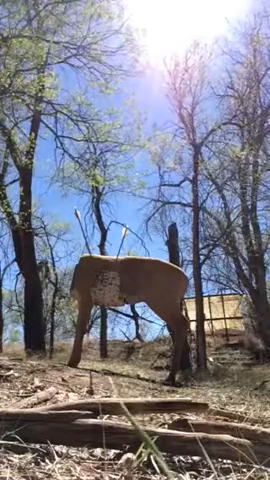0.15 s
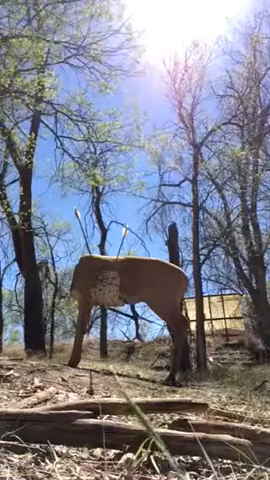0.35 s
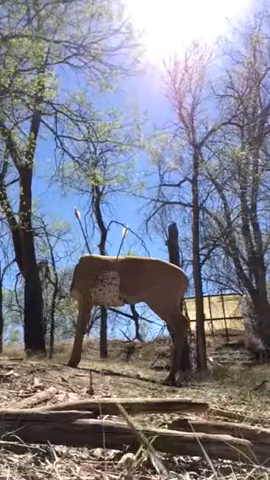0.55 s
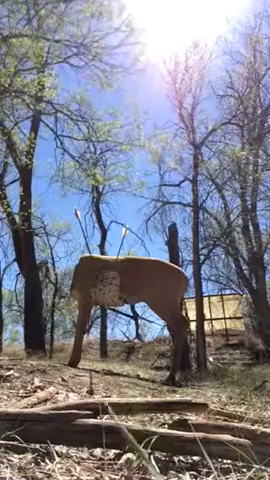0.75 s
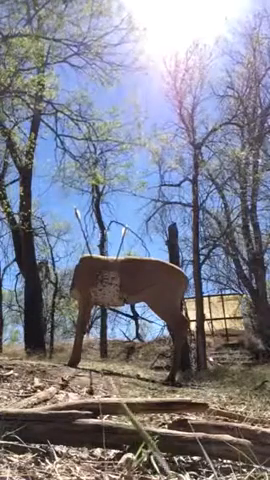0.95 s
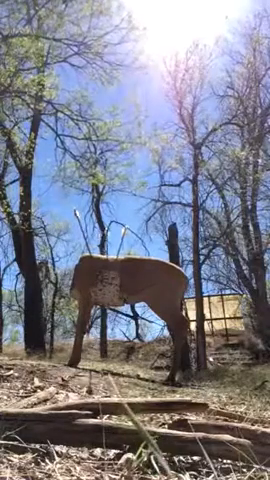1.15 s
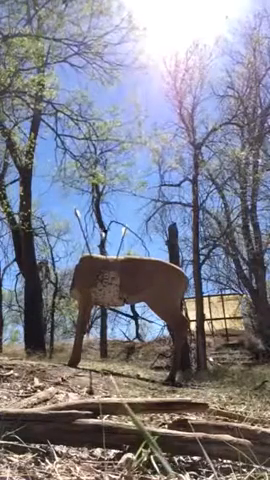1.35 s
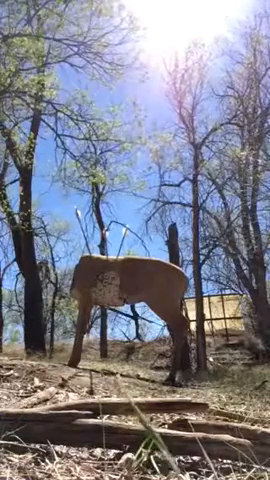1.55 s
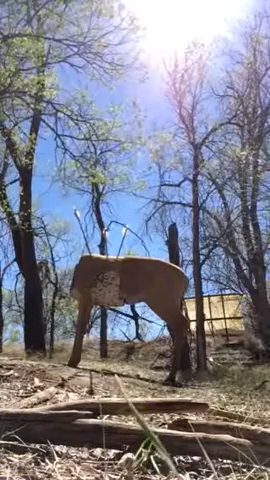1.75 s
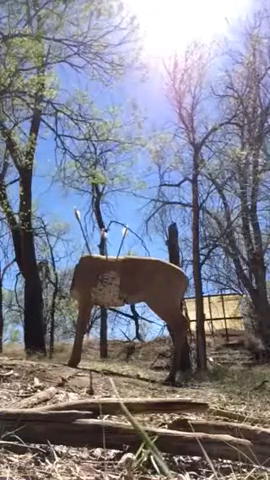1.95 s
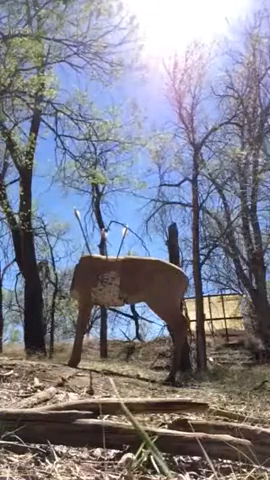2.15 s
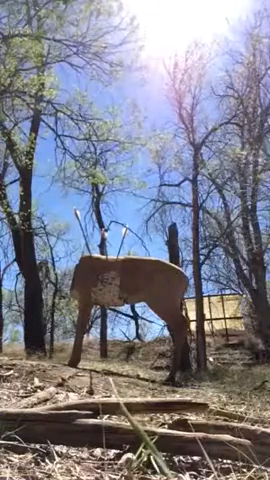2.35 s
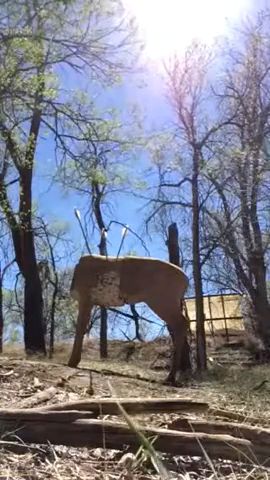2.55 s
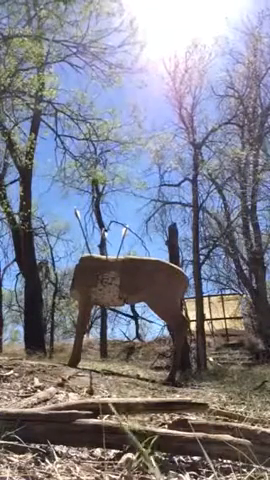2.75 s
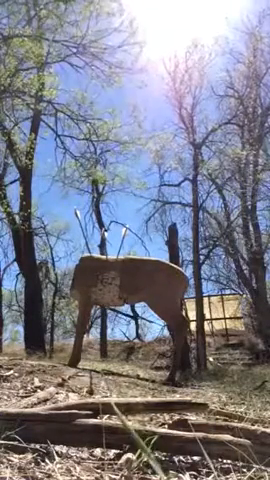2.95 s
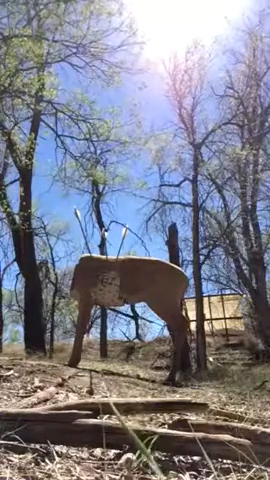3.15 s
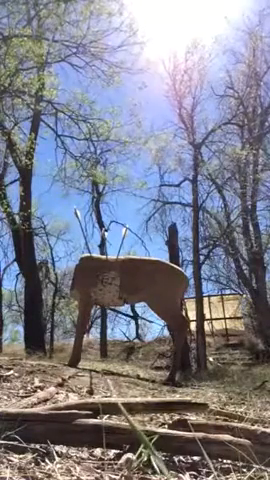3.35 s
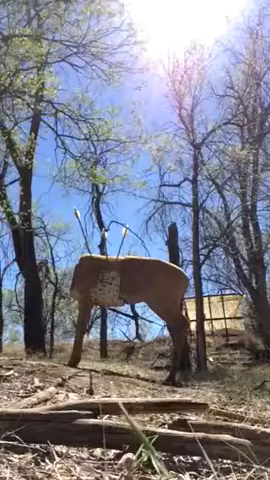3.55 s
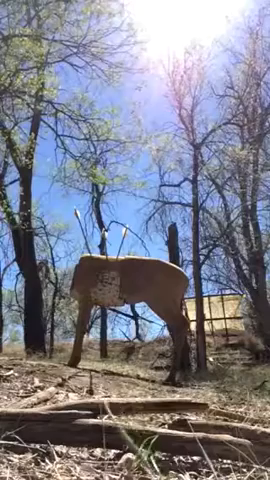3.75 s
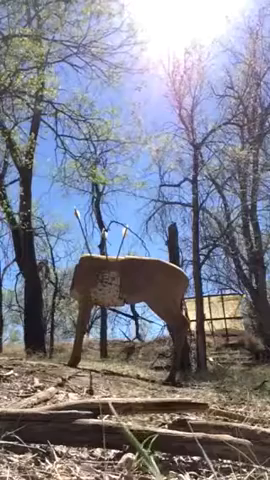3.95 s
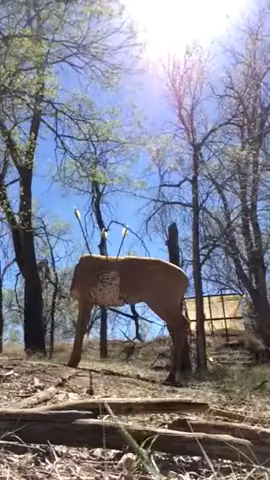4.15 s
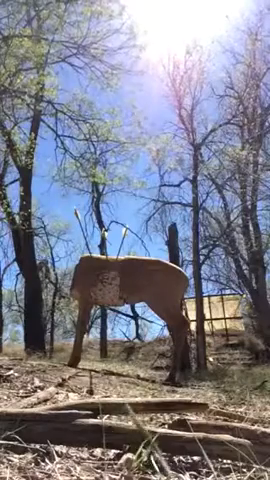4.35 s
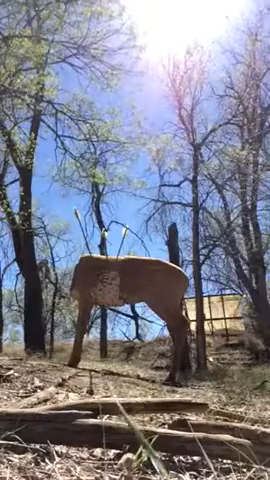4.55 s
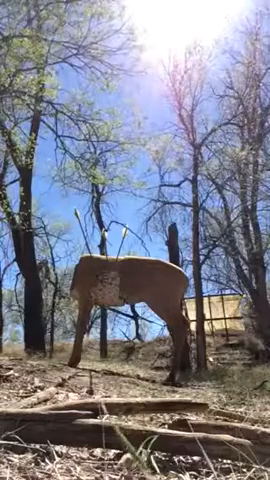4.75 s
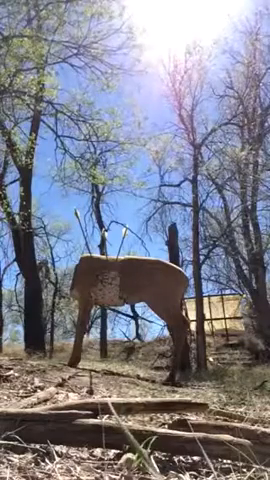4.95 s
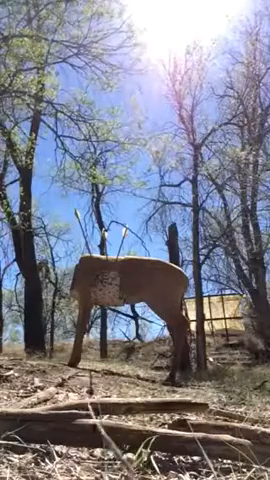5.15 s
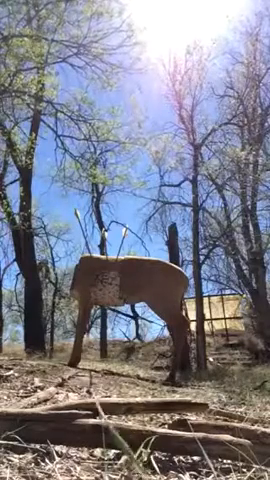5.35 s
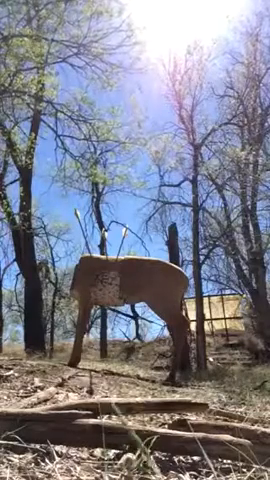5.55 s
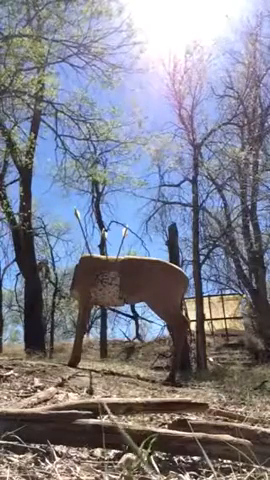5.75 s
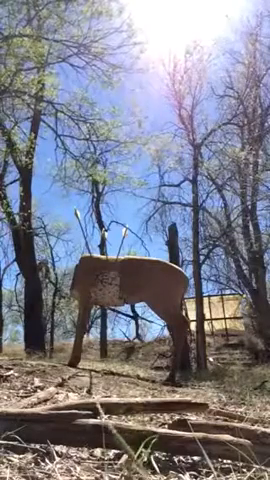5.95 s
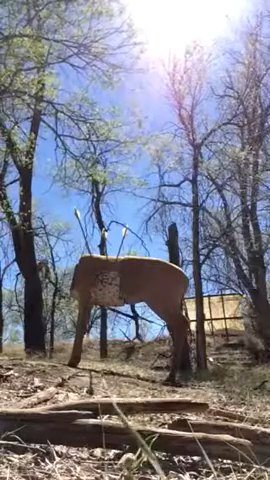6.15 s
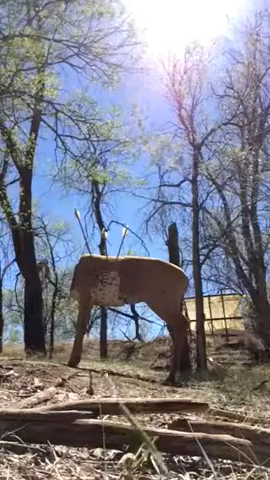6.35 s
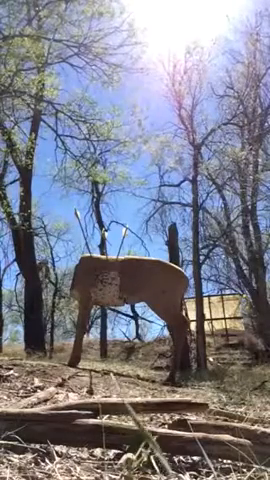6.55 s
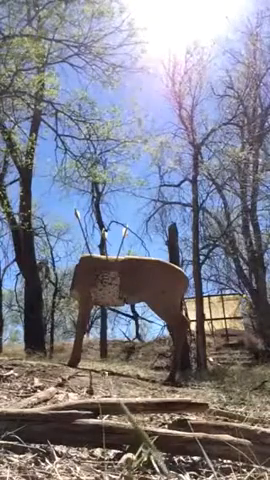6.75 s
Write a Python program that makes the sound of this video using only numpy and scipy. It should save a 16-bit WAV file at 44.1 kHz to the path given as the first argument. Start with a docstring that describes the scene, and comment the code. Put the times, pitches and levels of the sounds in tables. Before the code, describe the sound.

An arrow hisses by from a far-off wooden bow and hits a foam deer with a sharp thwack, followed by faint birdsong and breeze.

```python
"""An arrow leaves a distant wooden bow, hisses towards a phone in dry grass and smacks into a foam deer.
String and limbs ring; the feathers hum, dropping in pitch as they pass. The point cracks through the skin,
the foam body thuds, and trunks and leaf litter throw the blow back. A small bird alternates two slurred
phrases. Twigs and grass tick; light air stirs the wood and nudges the microphone."""
import sys
import numpy as np
from scipy import signal
from scipy.fft import rfft, irfft
from scipy.io import wavfile
from scipy.ndimage import uniform_filter1d

SR = 44100
rng = np.random.default_rng(int(sys.argv[2]) if len(sys.argv) > 2 else 0)


def pcm_store(signal):
    """Save signal as 16-bit PCM."""
    levels = np.round(np.clip(np.atleast_2d(signal), -1, 1) * 32767)
    wavfile.write(sys.argv[1], SR, levels.astype(np.int16).T)


N = 299181
TIME_S = np.arange(N) / SR
STRING_S, CLEARS_BOW_S, PASSES_MIC_S, SKIN_S, THUD_S = .7235, .742, .858, .91331, .91388

# Point tearing the skin, then biting the core. Each row: start in seconds, level in dB, t60 in seconds.
PUNCTURE_CLICKS = [(.9137, -23, .006), (.9157, -29, .012)]
# Target resonances. Each row: frequency in Hz, level in dB, t60 in seconds.
SKIN_MODES = [(1410, -15, .011), (1920, -14, .013), (2500, -11, 0.0098), (3420, -17, .012),
              (4750, -19.5, 0.01), (6490, -33, .009), (7080, -33, 0.011)]  # hard skin and shaft
FOAM_MODES = [(174, -5.5, .018), (284, -9, .021), (461.2, -5.5, .037), (496.3, -1, .016), (623, -7.5, .039),
              (845, -14.5, .045), (964, -17.5, .026)]
QUIVER_MODES = [(82, -39, .16), (401.5, -42, .28), (348, -29, 0.12)]  # legs and lodged arrow
# Noise spectra of the shot. Each row: frequency in Hz, relative density in dB.
TEAR_SPECTRUM = [(300, -10.5), (1500, 3), (3400, 2), (5500, -6), (7500, -10), (9000, -13.5), (15000, -13)]
RUB_SPECTRUM = [(300, -1), (700, 3.5), (1500, 2), (2300, -2), (4000, -11.5), (7500, -13), (9000, -18.5),
                (15000, -19)]
RUSH_SPECTRUM = [(200, -11.5), (600, 3), (1500, 0), (2500, -1.5), (4000, -3), (7500, -2.5), (9000, -13.5),
                 (15000, -22)]
FEATHER_SPECTRUM = [(400, -12), (1400, 6), (2500, -1), (4500, 0.5), (7000, 3), (10000, -2), (15000, -4)]
BOW_SPECTRUM = [(100, 0), (400, 3), (900, -1), (2000, -1.5), (3500, -7), (5000, -16.5), (8000, -22),
                (15000, -33)]
LITTER_SPECTRUM = [(60, -8), (190, 1), (400, 1), (750, 2), (1100, 0), (1700, -5), (2500, -10), (4000, -20),
                   (8000, -32.5), (15000, -42)]
# String release, snap, shaft brushing past. Each row: start in seconds, level in dB, t60 in seconds.
BOW_CLICKS = [(.708, -51, .06), (.7228, -44.5, .045), (.7465, -52, .015)]
# Limbs and string. Each row: frequency in Hz, level in dB, t60 in seconds.
BOW_MODES = [(82.015, -47.5, .2), (140, -30.5, .033), (275, -49.5, .12), (398, -58.5, .3),
             (669.06, -58, .25), (1850, -46, .12), (2300, -60, .1), (3400, -60, .12), (4640, -63.5, .1)]
# Near trunks. Each row: delay in seconds, gain in dB.
TRUNK_ECHOES = [(.036, -46), (.053, -42), (.064, -45), (.077, -41), (.097, -42), (.146, -52)]
# Reflection off bark and brush. Each row: frequency in Hz, relative gain in dB.
ECHO_SPECTRUM = [(60, -2), (200, 0.5), (450, -4), (720, 1), (860, -1), (1100, 7.5), (1400, -1),
                 (2500, -7.5), (4500, -10), (7000, -14), (15000, -20.5)]
# Bird calls. Each row: start in seconds, gain in dB.
FALLING_CALLS = [(1.084, -61.5), (3.43, -59.5), (5.407, -53.5)]
WAVY_CALLS = [(1.943, -61), (4.281, -52.5), (6.702, -54)]
# Their notes. Each row: rise and fall in seconds, opening and top pitch in Hz, relative level in dB.
FALLING_NOTES = [(.015, .012, 3650, 4330, -1), (.0095, .003, 3050, 4400, -8), (.0105, .005, 2650, 3550, 0),
                 (.006, .005, 2800, 3050, -4), (.005, .004, 2500, 2950, -12)]
WAVY_NOTES = [(.015, .02, 2900, 5300, -15), (.016, .007, 3450, 4200, 1), (.03, .012, 3200, 4000, -5),
              (.006, .005, 3100, 3650, -5.5), (.008, .004, 2600, 3600, -9)]
# Undergrowth ticks. Each row: start in seconds, level in dB, t60 in seconds.
TWIG_CLICKS = [(3.808, -63, 0.064), (3.84, -73, .08)]
GRASS_CLICKS = [(.535, -78, .04), (1.54, -83, .25), (1.608, -75, .06), (2.13, -78, .3), (5.452, -78, .1)]
# Wind swells. Each row: centre in seconds, level in dB, Gaussian sigma in seconds.
MIC_PUFFS = [(2.725, -53.5, 0.018), (3.866, -57.5, 0.016), (4.137, -45.5, 0.018), (4.242, -49, 0.026),
             (4.764, -59.5, 0.0334), (4.872, -50.5, 0.033), (5.221, -58, 0.031), (5.405, -53, 0.031),
             (5.54, -55.5, 0.0447), (5.68, -59, 0.07), (6.675, -63, 0.08)]
TREETOP_GUSTS = [(.05, -77.5, 0.41), (1.8, -86, .3), (5.72, -73.5, 0.32)]
# Background spectra. Each row: frequency in Hz, relative density in dB.
TWIG_SPECTRUM = [(600, -24.5), (1600, -5.5), (2200, -11), (2750, -1), (3600, -17.5), (8000, -27),
                 (15000, -38)]
GRASS_SPECTRUM = [(2000, -15), (6000, -4), (11000, 3), (15000, -4)]
BUFFET_SPECTRUM = [(20, -4.5), (40, -3.5), (80, 2), (130, -5.5), (200, -21), (400, -34), (1500, -74)]
WOOD_SPECTRUM = [(12, -43.5), (20, -12.5), (54, 1), (101, -2), (196, -2), (245, -5.5), (324, -5.5),
                 (565, -11.5), (705, -12), (811, -14.5), (906, -14.5), (1500, -19.5), (2760, -29),
                 (7730, -34), (15500, -39.5)]
TREETOP_SPECTRUM = [(200, -24.5), (550, -6.5), (900, 2.5), (1300, -8.5), (2200, -22.5), (6000, -41.5)]


def arrow_impact(rub_db=-36, rub_t60_s=.13, low_cut_hz=90):
    """The point cracks the skin, the body thuds and quivers, the shaft rubs to a halt."""
    crack = clicks(PUNCTURE_CLICKS, TEAR_SPECTRUM) - ring(SKIN_MODES, SKIN_S)
    thud = highpass(ring(FOAM_MODES, THUD_S), low_cut_hz)  # a small body radiates little bass
    rub = amp(rub_db) * decay(THUD_S, rub_t60_s) * noise(RUB_SPECTRUM)
    return crack + thud - ring(QUIVER_MODES, THUD_S) + rub


def arrow_flight(hum_hz=186, doppler_share=.155, doppler_s=.055, flutter_db=1.0):
    """Air rushes along the shaft; the feathers hiss and hum, Doppler-shifted as they pass."""
    pitch_hz = hum_hz * (1 - doppler_share * np.tanh((TIME_S - PASSES_MIC_S) / doppler_s))
    phase_rad = 2 * np.pi * np.cumsum(pitch_hz) / SR
    launch = swell(CLEARS_BOW_S, rise_t60_s=.2, fall_t60_s=.16)
    passing = swell(PASSES_MIC_S, rise_t60_s=.125, fall_t60_s=.27)
    rush = (amp(-67) + amp(-59) * launch + amp(-72) * passing) * noise(RUSH_SPECTRUM)
    hiss = (amp(-67) * launch + amp(-54.5) * passing) * noise(FEATHER_SPECTRUM)
    flutter = amp(flutter_db * np.sin(phase_rad))
    airborne = gate(STRING_S, THUD_S, attack_s=.005, release_s=.001)
    return airborne * ((rush + hiss) * flutter + feather_hum(phase_rad))


def feather_hum(phase_rad, level_db=-55.5, lead_s=.016):
    """Fluttering feathers: three harmonics, loudest just before the pass."""
    tone = np.sin(phase_rad) + amp(2) * np.sin(2 * phase_rad) + amp(-4) * np.sin(3 * phase_rad)
    return amp(level_db) * swell(PASSES_MIC_S - lead_s, rise_t60_s=.23, fall_t60_s=.31) * unit_rms(tone)


def bow():
    """The string snaps taut and leaves the limbs ringing."""
    return clicks(BOW_CLICKS, BOW_SPECTRUM) + ring(BOW_MODES, STRING_S)


def tree_echoes(shot):
    """Rough trunks return smeared echoes; brush and far trees scatter a thin tail."""
    trunks = sum(amp(db) * scatter(delay_s, t60_s=.045) for delay_s, db in TRUNK_ECHOES)
    brush = amp(-32) * scatter(.0046, t60_s=.13)
    far_trees = amp(-42) * scatter(.07, t60_s=.8)
    return signal.fftconvolve(shot, colour(trunks + brush + far_trees, ECHO_SPECTRUM))[:N]


def leaf_litter(level_db=-45, peak_s=.96, rise_s=.05, t60_s=.19):
    """The forest floor scatters the blow back as a dull rustle."""
    rise = np.clip(1 + (TIME_S - peak_s) / rise_s, 0, 1)
    fall = amp(-60 * np.maximum(TIME_S - peak_s, 0) / t60_s)
    return amp(level_db) * rise * fall * noise(LITTER_SPECTRUM)


def bird(branch_db=-14, branch_s=.0087, crowns_db=-10.5, crowns_t60_s=.42):
    """Two phrases in turn, echoed by a near branch and the crowns."""
    song = np.zeros(N)
    for notes, calls in (FALLING_NOTES, FALLING_CALLS), (WAVY_NOTES, WAVY_CALLS):
        for start_s, db in calls:
            song += amp(db) * (phrase(notes, start_s) + lisp(start_s))
    branch = np.interp(TIME_S - branch_s, TIME_S, song)
    crowns = signal.fftconvolve(song, scatter(branch_s, crowns_t60_s))[:N]
    return song + amp(branch_db) * branch + amp(crowns_db) * crowns


def phrase(notes, start_s, slur_s=.003, dip_db=-2.5, closing_hz=3200, throat_hz=3600, half_band_hz=950):
    """Slurred notes, each rising and falling; pitches outside the throat's band grow faint."""
    rise_s, fall_s, opening_hz, top_hz, note_db = np.transpose(notes)
    ends_s = start_s + np.cumsum(rise_s + fall_s)
    tops_s = ends_s - fall_s
    turns_s = np.append(np.column_stack([tops_s - rise_s, tops_s]), ends_s[-1])
    turns_hz = np.append(np.column_stack([opening_hz, top_hz]), closing_hz)
    pitch_hz = uniform_filter1d(np.interp(TIME_S, turns_s, turns_hz), int(slur_s * SR) + 1)
    between_notes = np.interp(TIME_S, turns_s, 1 - np.arange(len(turns_s)) % 2)
    throat = 1 / np.hypot(1, ((pitch_hz - throat_hz) / half_band_hz) ** 2)
    gain = amp(np.interp(TIME_S, tops_s, note_db) + dip_db * between_notes)
    voiced = gate(start_s, ends_s[-1], attack_s=.011, release_s=.004)
    return voiced * gain * throat * whistle(pitch_hz, waver_share=.018)


def lisp(phrase_s, lead_s=.018, length_s=.03, glide_hz=(4700, 6300), gain_db=-18.5):
    """A rasping upward glide from the other side of the syrinx leads into a phrase."""
    start_s = phrase_s - lead_s
    end_s = start_s + length_s
    pitch_hz = np.interp(TIME_S, [start_s, end_s], glide_hz)
    envelope = gate(start_s, end_s, length_s / 2, length_s / 2)
    return amp(gain_db) * envelope * whistle(pitch_hz, waver_share=.08)


def whistle(pitch_hz, waver_share):
    """A gliding sine, made hoarse by fast pitch jitter."""
    jittered_hz = pitch_hz * (1 + waver_share * wander(rate_hz=900))
    return np.sin(2 * np.pi * np.cumsum(jittered_hz) / SR)


def undergrowth():
    """Dry twigs tick; grass stirs beside the microphone."""
    return clicks(TWIG_CLICKS, TWIG_SPECTRUM) + clicks(GRASS_CLICKS, GRASS_SPECTRUM)


def mic_buffets():
    """Eddies push softly on the microphone port."""
    return noise(BUFFET_SPECTRUM) * bumps(MIC_PUFFS)


def woodland_air(bed_db=-63.5, split_hz=400, rumble_db_per_s=-.9, treetops_db=-82, hiss_db=-87):
    """Distant rumble eases off and gusts stir the treetops over a faint hiss."""
    bed = amp(bed_db) * noise(WOOD_SPECTRUM)
    lows = signal.sosfiltfilt(signal.butter(2, split_hz, fs=SR, output="sos"), bed)
    rumble = lows * amp(2.5 + rumble_db_per_s * TIME_S + wander(rate_hz=9))
    breeze = (amp(treetops_db) + bumps(TREETOP_GUSTS)) * amp(wander(rate_hz=4))
    treetops = breeze * noise(TREETOP_SPECTRUM)
    hiss = amp(hiss_db) * noise([(2500, -21), (5000, -5.5), (7700, -.5), (8300, -19.5), (15000, -26.5)])
    return bed - lows + rumble + treetops + hiss


def ring(modes, start_s):
    """Modes struck at once, alternating in sign."""
    phase_rad_per_hz = 2 * np.pi * (TIME_S - start_s)
    return sum((-1) ** k * amp(db) * decay(start_s, t60_s) * np.sin(hz * phase_rad_per_hz)
               for k, (hz, db, t60_s) in enumerate(modes))


def clicks(rows, spectrum):
    """Decaying noise bursts with one spectrum."""
    envelope = sum(amp(db) * decay(start_s, t60_s) for start_s, db, t60_s in rows)
    return colour(rng.standard_normal(N) * envelope, spectrum)


def scatter(start_s, t60_s):
    """Dense fading reflections of unit energy."""
    return unit_rms(decay(start_s, t60_s) * rng.standard_normal(N)) / np.sqrt(N)


def noise(spectrum):
    """Coloured noise of rms 1."""
    return unit_rms(colour(rng.standard_normal(N), spectrum))


def colour(x, spectrum, fft_size=8192):
    """Minimum-phase filter; white noise keeps its power."""
    hz, db = np.transpose(spectrum)
    bins_hz = np.arange(fft_size // 2 + 1) * SR / fft_size
    gain = unit_rms(amp(np.interp(np.log(bins_hz + 1), np.log(hz), db)))
    cepstrum = irfft(np.log(gain))[:fft_size // 2]
    cepstrum[1:] *= 2
    response = irfft(np.exp(rfft(cepstrum, fft_size)))
    return signal.fftconvolve(x, response)[:N]


def highpass(x, cutoff_hz):
    """Second-order bass cut."""
    return signal.sosfilt(signal.butter(2, cutoff_hz, "high", fs=SR, output="sos"), x)


def decay(start_s, t60_s):
    """Silence, then an exponential fall from 1."""
    return (TIME_S >= start_s) * amp(-60 * np.maximum(TIME_S - start_s, 0) / t60_s)


def swell(peak_s, rise_t60_s, fall_t60_s):
    """Exponential rise to 1 and fall."""
    return amp(-60 * np.maximum((peak_s - TIME_S) / rise_t60_s, (TIME_S - peak_s) / fall_t60_s))


def bumps(rows):
    """Sum of Gaussian swells."""
    return sum(amp(db) * np.exp(-.5 * ((TIME_S - peak_s) / sigma_s) ** 2) for peak_s, db, sigma_s in rows)


def gate(start_s, end_s, attack_s, release_s):
    """Linear attack, hold, release."""
    return np.clip(np.minimum((TIME_S - start_s) / attack_s, (end_s - TIME_S) / release_s), 0, 1)


def wander(rate_hz):
    """Random curve with a spread near 1."""
    knots = rng.standard_normal(16384)
    return np.interp(TIME_S * rate_hz, np.arange(len(knots)), knots)


def amp(db):
    """Decibels to gain."""
    return 10 ** (np.asarray(db) / 20)


def unit_rms(x):
    """Scale to rms 1."""
    return x / np.sqrt(np.mean(x ** 2))


def scene():
    """The shot among the trees, with bird and breeze; mono."""
    shot = bow() + arrow_flight() + arrow_impact()
    ticks = undergrowth()
    mix = shot + tree_echoes(shot) + leaf_litter() + bird() + ticks + woodland_air() + mic_buffets()
    return mix[None]


def record(dry):
    """The phone thins the deepest bass and cuts the top."""
    low_cut_hz, high_cut_hz = 22, 15400
    lowpass = signal.ellip(10, .2, 70, high_cut_hz, fs=SR, output="sos")
    return signal.sosfilt(lowpass, highpass(dry, low_cut_hz))


dry = scene()
out = record(dry)
pcm_store(out)
```